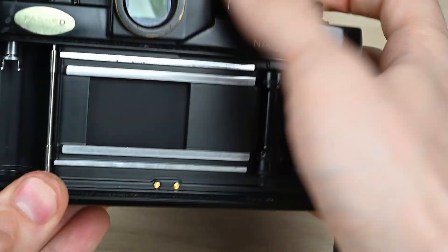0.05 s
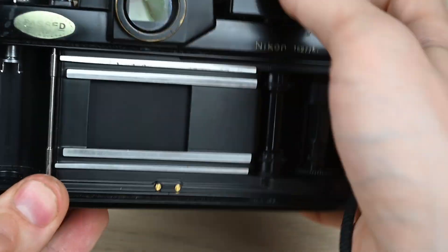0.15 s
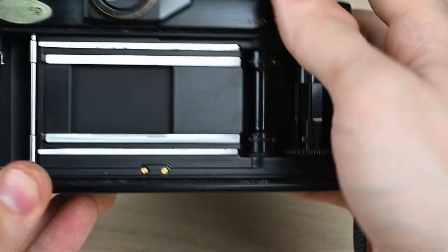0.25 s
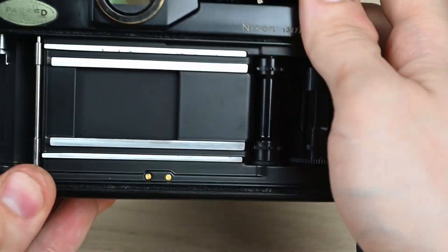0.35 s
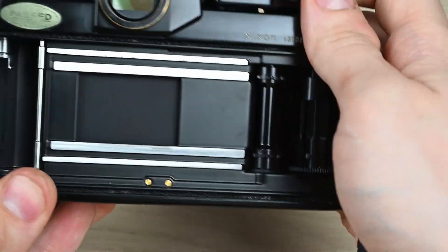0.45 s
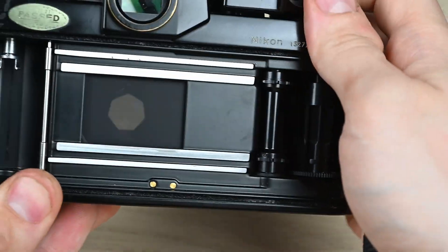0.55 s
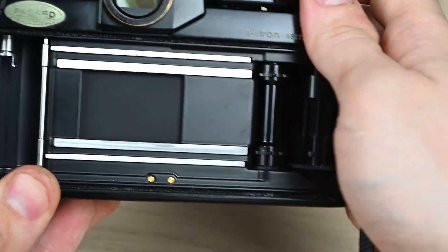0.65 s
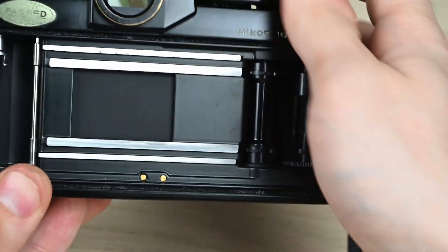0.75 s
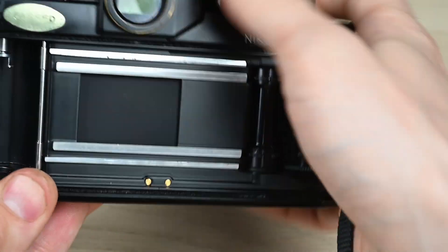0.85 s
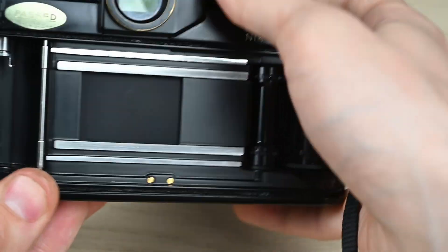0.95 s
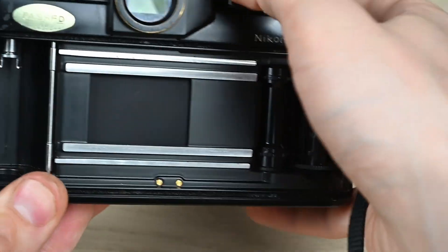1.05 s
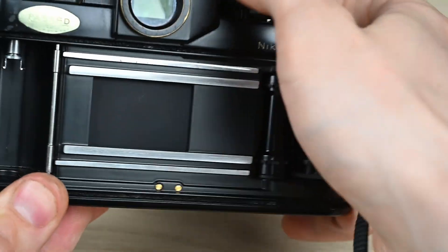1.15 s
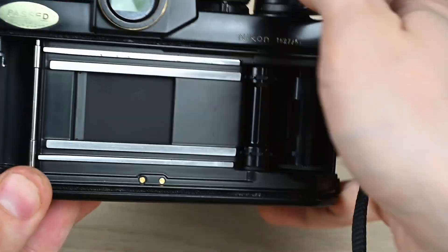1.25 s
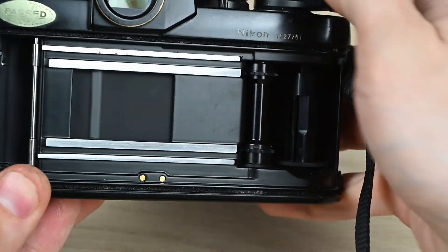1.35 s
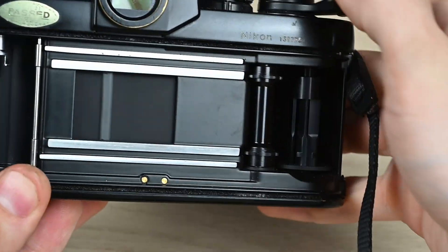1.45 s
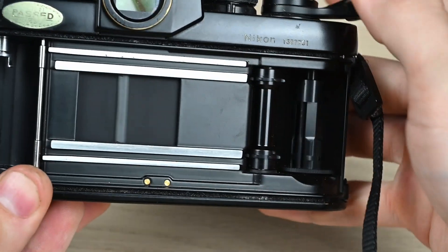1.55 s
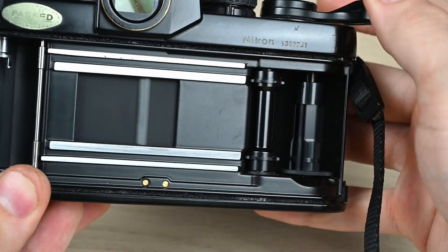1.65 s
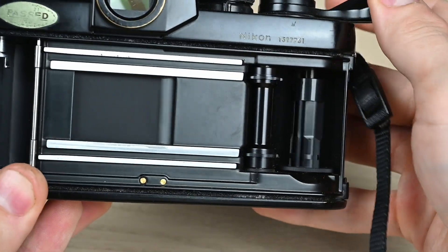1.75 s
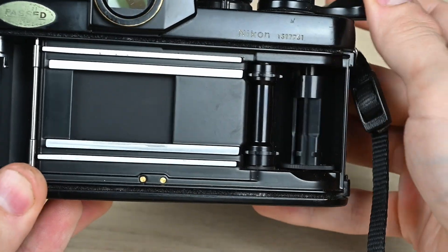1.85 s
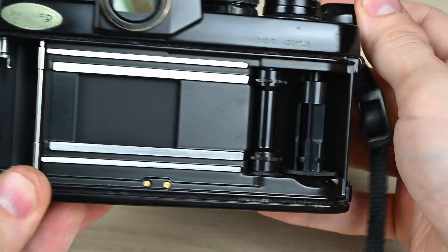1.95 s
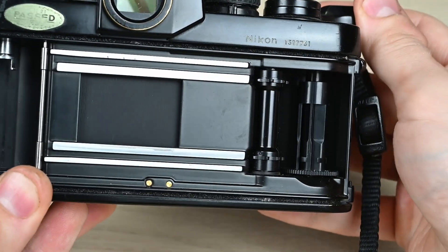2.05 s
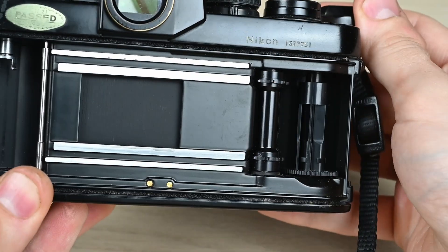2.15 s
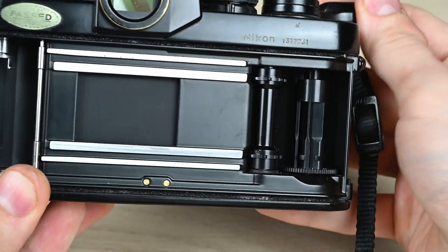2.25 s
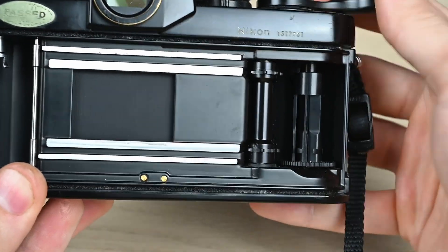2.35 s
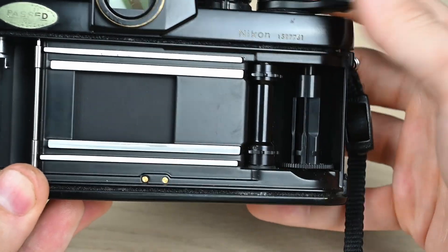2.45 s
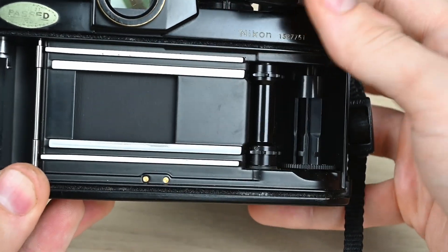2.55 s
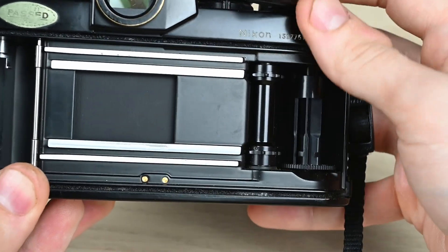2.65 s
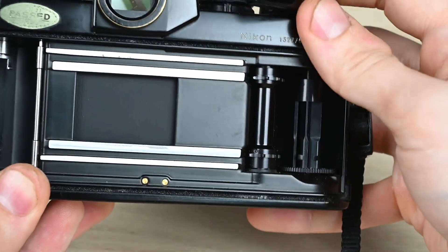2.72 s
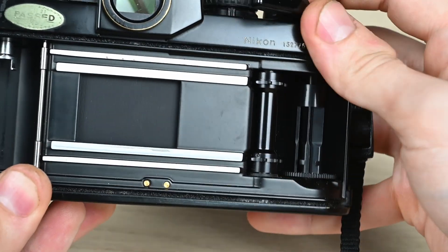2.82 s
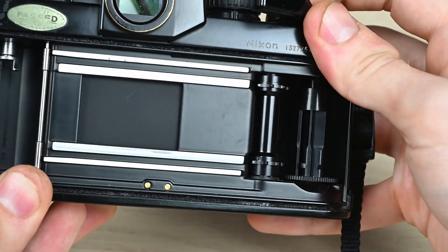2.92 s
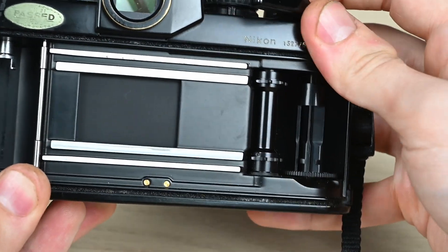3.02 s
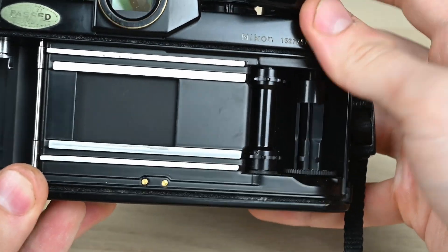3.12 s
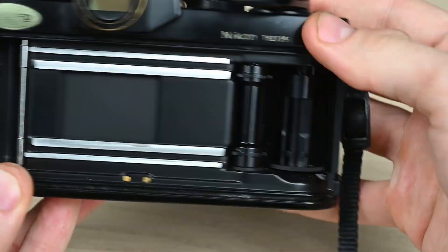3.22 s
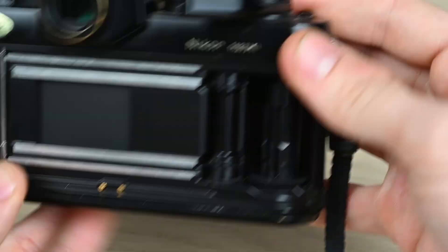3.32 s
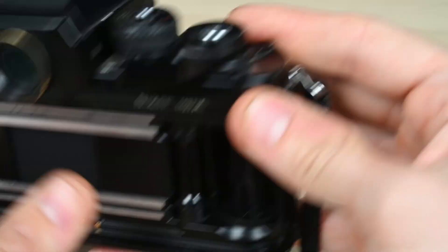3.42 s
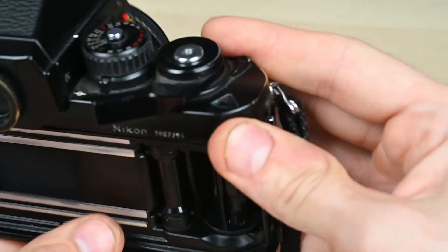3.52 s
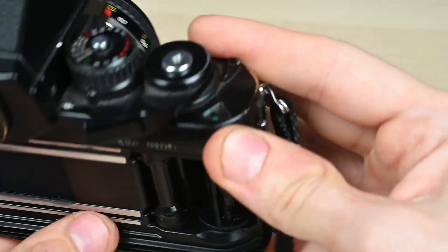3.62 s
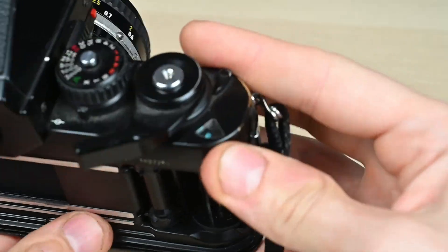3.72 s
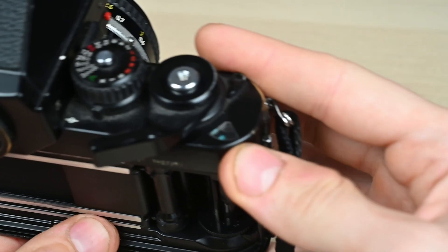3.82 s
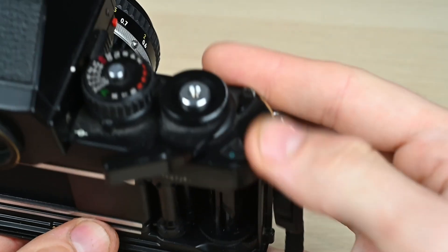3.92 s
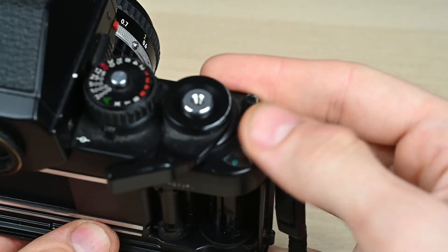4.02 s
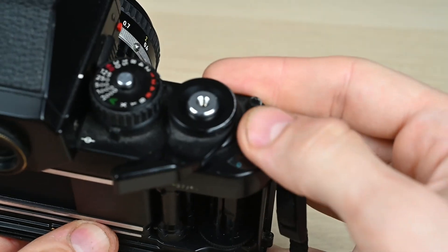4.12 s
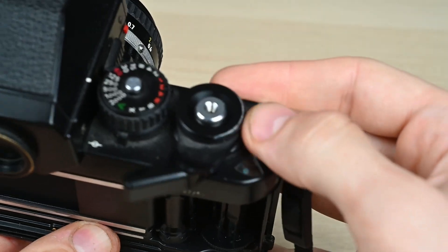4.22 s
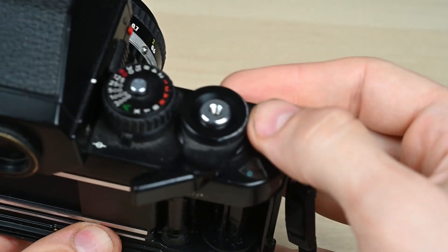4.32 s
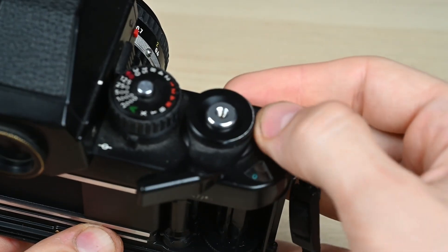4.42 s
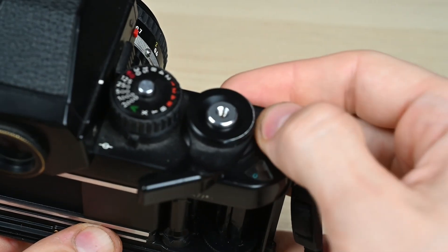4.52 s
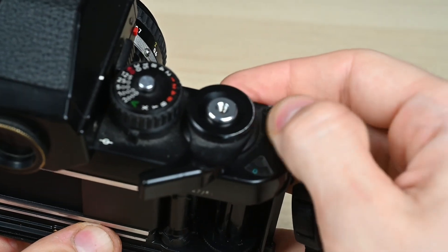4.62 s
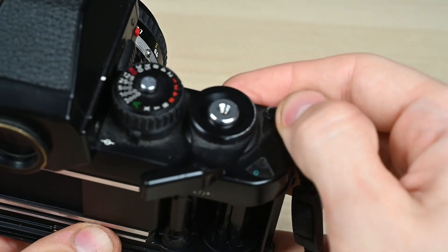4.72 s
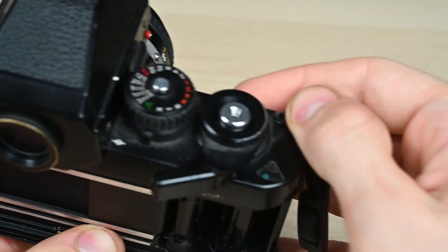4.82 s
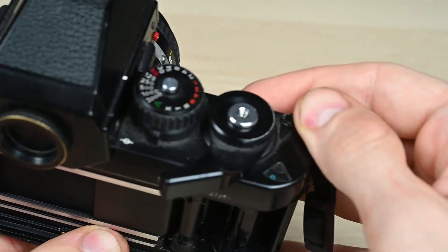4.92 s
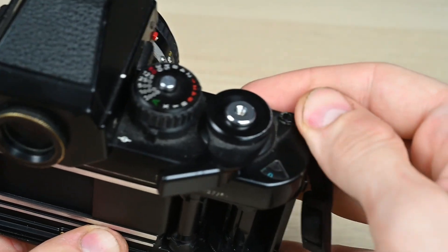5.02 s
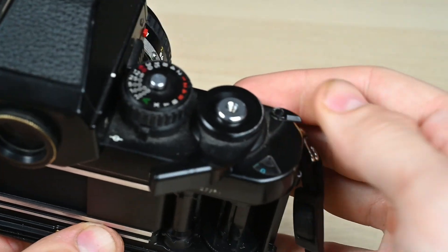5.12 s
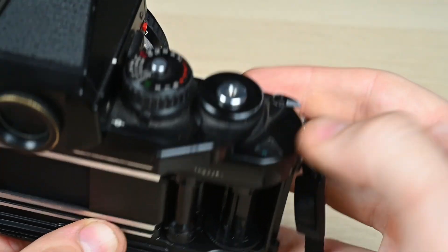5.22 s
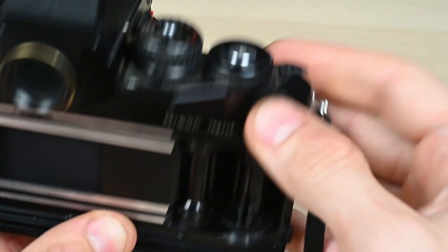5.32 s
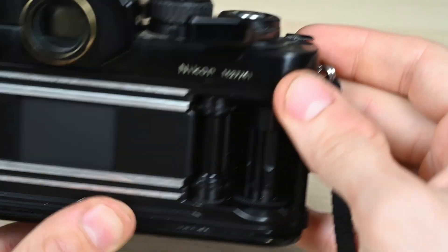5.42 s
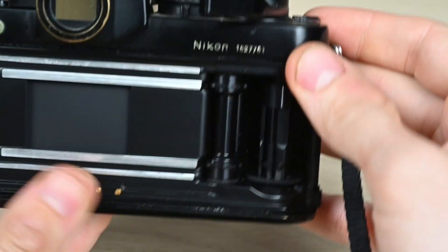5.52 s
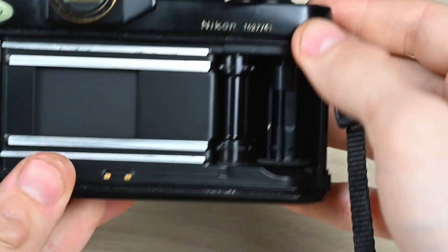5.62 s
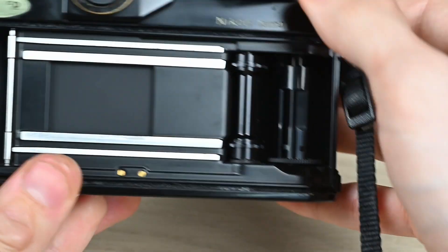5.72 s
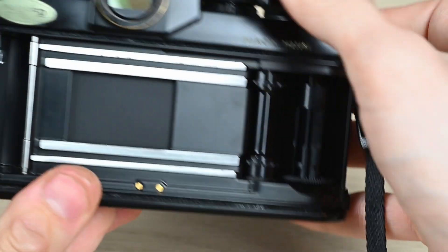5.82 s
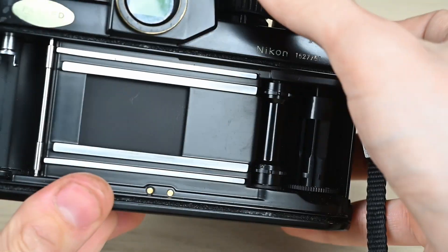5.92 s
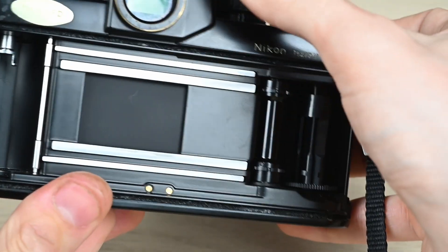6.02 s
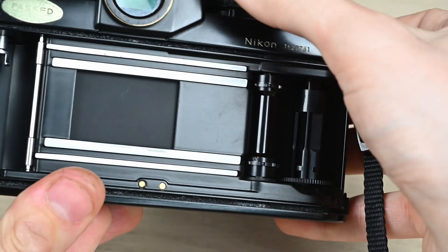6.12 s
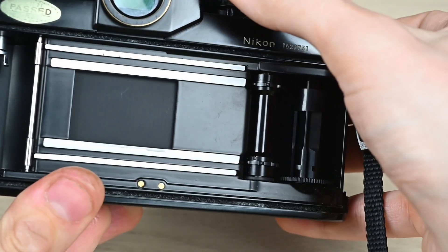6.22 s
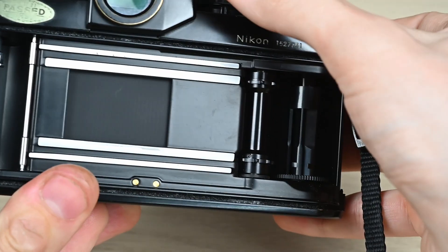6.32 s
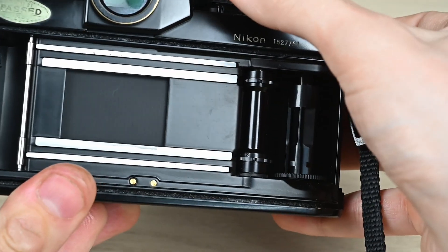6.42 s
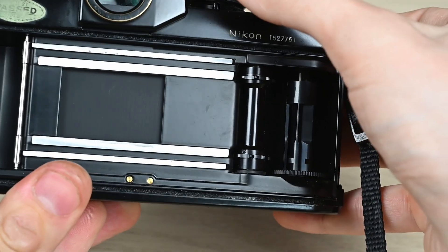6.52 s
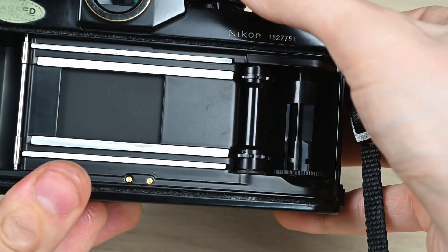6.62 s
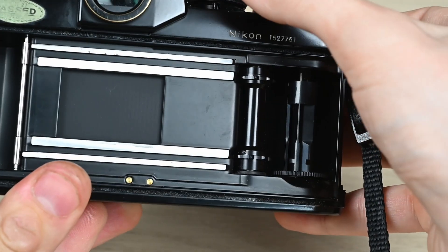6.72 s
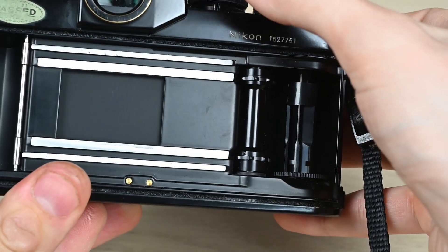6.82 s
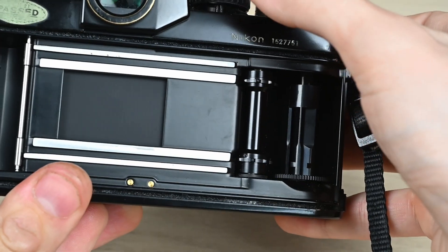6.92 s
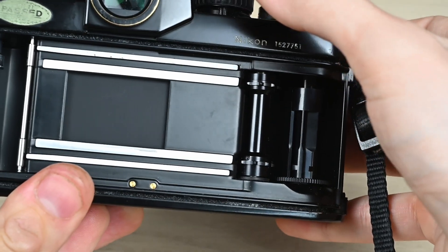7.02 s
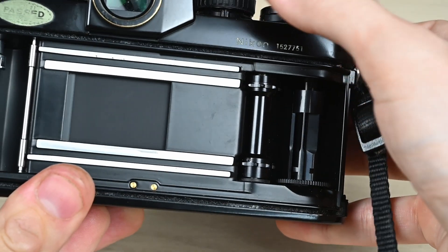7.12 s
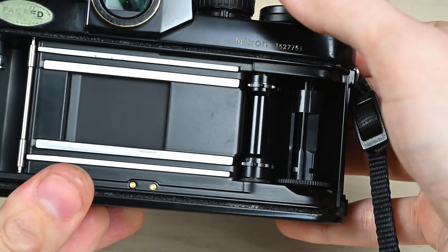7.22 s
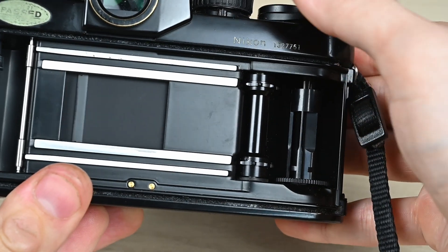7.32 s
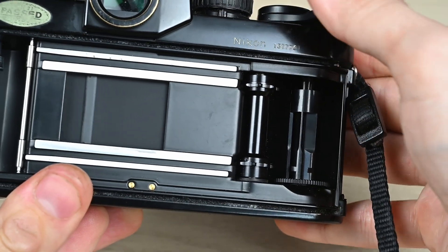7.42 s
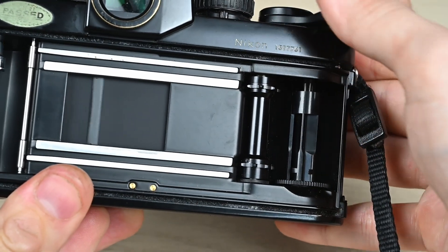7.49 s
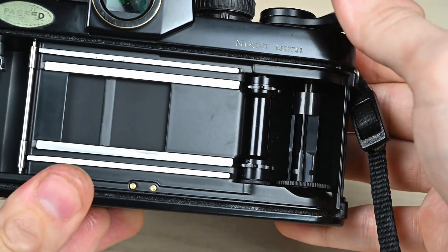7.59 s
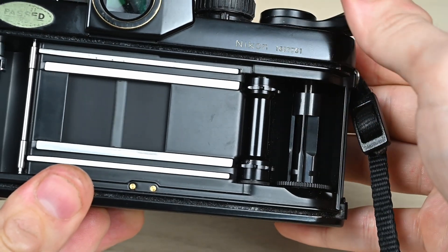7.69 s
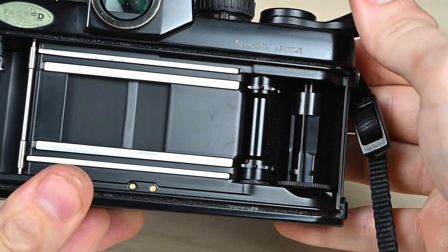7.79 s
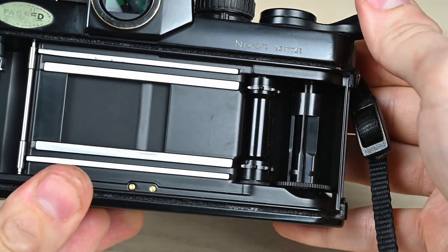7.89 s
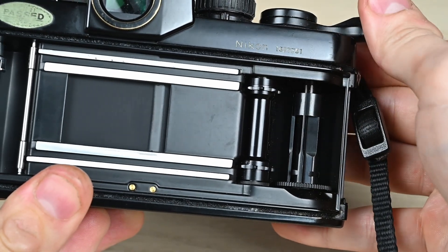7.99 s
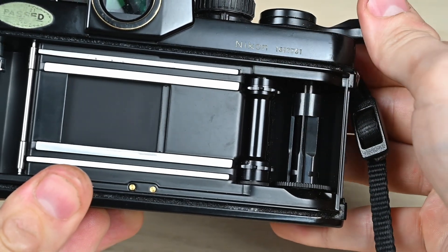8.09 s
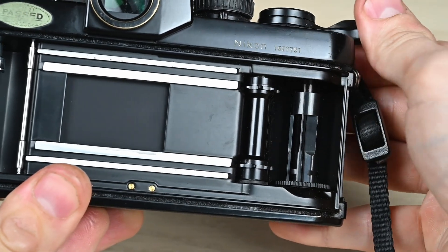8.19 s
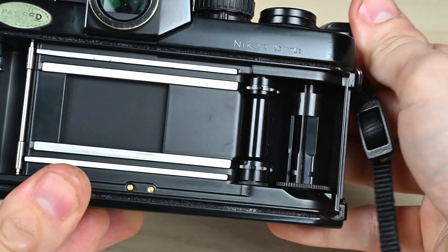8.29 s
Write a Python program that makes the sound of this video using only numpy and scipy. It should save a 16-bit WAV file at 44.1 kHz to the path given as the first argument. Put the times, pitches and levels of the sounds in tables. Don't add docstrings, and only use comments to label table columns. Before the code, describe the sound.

A mechanical film camera is handled very close to the microphone in a small, quiet room with faint low rumble and a short diffuse tail. Soft finger taps and scrapes lead to a loud shutter clack at 0.6 s, a dense burst of metal impacts lasting about 60 milliseconds, with a tiny settling tick afterward. From 1.15 to 1.8 s the wind lever's gears tick lightly with sliding friction and a bright pawl snap, then a catch and hard clunk at 1.9-2.0. A crisp latch snaps at 2.53, and the shutter fires again at 2.9, slightly softer. From 3 to 6.9 s there are only faint taps, creaks, scrapes and dull palm thuds, with a regrip near 5.5. A small double click comes at 6.96. Scraping and sparse ticks from 7.1 build to a bright pawl drop near 7.96, a catch at 8.18 and a final heavy lever stop around 8.3.

```python
import sys
import numpy as np
from scipy import signal
from scipy.fft import rfft, irfft, next_fast_len
from scipy.io import wavfile
from scipy.ndimage import uniform_filter1d

SR = 44100
rng = np.random.default_rng(int(sys.argv[2]) if len(sys.argv) > 2 else 0)


def gain_from_db(level_db):
    decades = np.asarray(level_db, float) / 20
    return 10 ** decades


def file_out(sig):
    cols = np.atleast_2d(sig).T
    lim = np.clip(cols, -1, 1)
    pcm = np.round(lim * 32767).astype(np.int16)
    wavfile.write(sys.argv[1], SR, pcm)


N = 368235

# pitch [Hz], width [Hz], level [dB].
GEAR_RING = [(594, 330, 10), (1750, 300, 5.5), (3780, 620, -0.5), (5470, 350, -10), (6740, 1700, -11.5),
             (9500, 310, -19), (9700, 67, -13), (13200, 180, -8.5), (14500, 430, -11.5)]


def shutter():
    # time in s, peak in dB, strongest ring in Hz, bass in dB, treble in dB.
    impacts = [
        (.557, -25.5, 1363, -11, 1.5),
        (.5587, -7, 2682, -25, -3),
        (.5835, -15.5, 1161, -8, -6.5),
        (.5919, -8, 1990, -22.5, -5),
        (.5942, -22, 9500, -14.5, 7.5),
        (.6068, -9.5, 2816, -16, 7),
        (.6114, -10, 1677, -21, -3),
        (.6134, -6.5, 2800, -21, -4),
        (.6172, -14, 2684, -11.5, 3.5),
        (.722, -28.5, 2059, -8.5, 7),
    ]
    # s after the first firing, level in dB.
    firings = [
        (0.0, -1.46),
        (2.3310, -2),
    ]
    # base in ms, ms per dB of treble, ms per dB under full scale.
    rattle = (3.8, 0.27, .05)
    # pitch in Hz, width in Hz, level in dB.
    ring = [(640, 250, -12.5), (790, 44, -2.5), (1270, 60, 4.5), (1900, 64, 0), (2890, 87, -2),
            (4082, 56, 0), (5900, 190, -8.5), (8800, 400, -14.5), (10700, 230, -15.5), (13300, 510, -15)]
    # s in the first firing, peak in dB, pitch in Hz, t60 in s.
    casting = [
        (.6116, -7, 795, .028),
        (.6116, -9, 1250, .022),
        (.6116, -18, 640, .04),
        (.6116, -21, 1220, .07),
        (.6116, -19, 1277, .07),
        (.5590, -17, 1350, .04),
        (.5838, -23, 1100, .025),
    ]
    once = clicks(timed(impacts, rattle), ring, own_db=2, plain_db=-9, lead=1.2)
    once = once - swings(casting, rise_s=.0003)
    out = np.zeros(N)
    for later, db in firings:
        add(out, later, gain_from_db(db) * once)
    return out


def lever_stops():
    # time in s, peak in dB, strongest ring in Hz, bass in dB, treble in dB.
    stops = [(1.9405, -17.5, 1900, -15, -8.5), (1.9448, -16.5, 2960, -18, -0.5),
             (1.9630, -20.5, 1840, -18, -14), (1.9668, -3, 1270, -8, -13.5),
             (1.9715, -18.5, 3774, -11, -0.5), (8.2703, -21.5, 725, -10, 0), (8.2738, -14, 1900, -7.5, -9),
             (8.2777, -11, 2850, -17, -4.5), (8.3258, -24.5, 1780, -10, -15), (8.3294, -2, 1270, -8.5, -21),
             (8.3335, -16, 1502, -11, -2)]
    catches = [
        (1.8750, -16, 4710, -25.5, -17.5),
        (8.1834, -18, 4230, -28, -22),
    ]
    # base in ms, ms per dB of treble, ms per dB under full scale.
    stop_rattle = (1.7, -0.016, 0.12)
    catch_rattle = (1.4, 0, 0)
    # pitch in Hz, width in Hz, level in dB.
    ring = [(570, 870, -2), (1270, 80, 2.5), (1700, 170, 1), (2460, 90, -10.5), (3200, 100, -13),
            (4400, 370, -9.5), (7030, 470, -6), (9400, 600, -13), (12600, 900, -15)]
    rows = timed(stops, stop_rattle) + timed(catches, catch_rattle)
    return clicks(rows, ring, own_db=1, plain_db=-12, lead=3.5)


def gear_teeth():
    # time in s, peak in dB, strongest ring in Hz, treble in dB.
    ticks = [(1.14, -51, 2030, 2), (1.1755, -40.5, 790, 3.5), (1.2215, -36, 4800, -10),
             (1.2388, -30.5, 2160, 1.5), (1.2425, -34.5, 1798, -9), (1.253, -32.5, 1750, -1),
             (1.2465, -30.5, 1700, -25), (1.2815, -48.5, 594, 8.5), (1.366, -43, 1190, -4),
             (1.394, -41, 1930, -19.5), (1.522, -55, 610, 15), (1.6265, -40, 4150, 1),
             (1.631, -34, 1800, -9), (1.646, -40, 7400, 8), (1.652, -41, 7500, -2), (1.67, -43, 1720, -3),
             (1.64, -29, 3780, 6.5), (1.6555, -29, 1740, -1), (1.6615, -29, 1720, -4),
             (1.681, -37.5, 3000, 3.5), (1.905, -52, 1472, -0.5), (7.195, -46.5, 1605, -8.5),
             (7.298, -58.5, 1168, -6), (7.392, -50.5, 1247, -6.5), (7.422, -47, 897, -18.5),
             (7.44, -40.5, 2005, -23.5), (7.7185, -36.5, 3760, -5), (7.7498, -28.5, 3940, 7),
             (7.78, -48, 577, -9), (7.787, -25.5, 3020, -5), (7.8245, -39.5, 3540, 8.5),
             (7.865, -42.5, 2800, -13), (7.909, -50, 700, -17), (8.03, -50.5, 760, -22),
             (8.073, -63, 1180, -9)]
    # dB at 1 kHz, dB per octave of the ring.
    bass = (0.3, -10)
    # base in ms, ms per dB of treble, ms per dB under full scale.
    rattle = (2.8, -.02, -.003)
    return clicks(timed(weighted(ticks, bass), rattle), GEAR_RING, own_db=10.5, plain_db=-9, lead=4.7)


def pawls():
    # time in s, peak in dB, strongest ring in Hz, bass in dB, treble in dB.
    drops = [
        (1.7668, -25, 6646, -13, 5),
        (7.737, -42.5, 7050, -6, 2.2),
        (7.76, -39, 7580, -22, 4.4),
        (7.9645, -23, 5000, -34, 2),
    ]
    # base in ms, ms per dB of treble, ms per dB under full scale.
    rattle = (3.5, 0.0082, 0.034)
    # pitch in Hz, width in Hz, level in dB.
    ring = [(1934, 120, 0), (4900, 600, -3.5), (6900, 54, 1.5), (6726, 520, -1.5), (7700, 170, -1.5),
            (8750, 130, -12.5), (10300, 120, -24.5), (13100, 190, -13)]
    return clicks(timed(drops, rattle), ring, own_db=-9.0, plain_db=-7.0, lead=7.0)


def latches():
    # time in s, peak in dB, strongest ring in Hz, bass in dB, treble in dB.
    snaps = [
        (2.5332, -14, 4530, -34, -3),
        (2.5348, -8.5, 2030, -32, -1),
        (2.5362, -11, 2710, -32, -2),
        (2.545, -23, 2400, -30, -4),
        (2.552, -28, 2030, -30, -4),
        (2.556, -26, 2710, -30, -4),
    ]
    # base in ms, ms per dB of treble, ms per dB under full scale.
    rattle = (.6, 0, .12)
    # pitch in Hz, width in Hz, level in dB.
    ring = [(2030, 250, -0.5), (2414, 73, 9), (2710, 110, -5.5), (3060, 860, -3.5), (3480, 120, 4),
            (3980, 320, -3.5), (4530, 230, 2.5), (5090, 100, -5.5), (6800, 300, -15.5), (9000, 120, -6.5),
            (9730, 120, -1.5), (11700, 300, -7)]
    return clicks(timed(snaps, rattle), ring, own_db=-43, plain_db=-9.5, lead=0.4)


def button():
    # time in s, peak in dB, strongest ring in Hz, bass in dB, treble in dB.
    presses = [
        (6.9553, -31, 9050, -14.5, 3.9),
        (6.9592, -23.5, 1750, -38, 4.4),
    ]
    # base in ms, ms per dB of treble, ms per dB under full scale.
    rattle = (2.6, 0, 0)
    # pitch in Hz, width in Hz, level in dB.
    ring = [(1770, 67, 4.5), (2780, 91, -3), (6530, 104, -10), (8700, 320, -12), (8900, 93, -4),
            (12200, 180, 1.5), (14100, 400, -8)]
    return clicks(timed(presses, rattle), ring, own_db=-1.5, plain_db=-9.5, lead=4.2)


def rides():
    # start in s, length in s, level in dB, pitch in Hz.
    hums = [
        (1.742, .03, -52, 800),
        (1.782, .035, -53, 780),
        (1.862, .015, -52, 780),
        (1.655, .028, -47, 1720),
        (1.245, .04, -51, 1750),
        (1.241, .045, -50, 640),
        (7.915, .048, -56, 880),
    ]
    noise, hz = rfft(rng.standard_normal(N)), np.fft.rfftfreq(N, 1 / SR)
    out = np.zeros(N)
    for start, length, db, pitch_hz in hums:
        hum = irfft(noise * mode(hz, pitch_hz, .14 * pitch_hz) ** 2, N)
        out += stroke(start, length, db) * evened(hum)
    return gain_from_db(-2.0) * out


def slides():
    # start in s, length in s, level in dB, centre of the scrape in Hz.
    scrapes = [(0.0, 0.13, -70, 1440), (0.267, 0.145, -72, 1278), (1.159, 0.29, -68, 1210),
               (1.491, 0.23, -64, 634), (1.612, 0.065, -55.5, 1410), (1.706, 0.12, -58, 790),
               (1.86, 0.068, -66, 780), (3.243, 0.132, -69, 1175), (3.645, 0.17, -76, 1012),
               (4.634, 0.123, -78.5, 2314), (5.885, 0.098, -76, 2437), (6.195, 0.11, -75, 1304),
               (6.297, 0.26, -79.5, 1836), (7.124, 0.39, -72, 1037), (7.53, 0.14, -63, 657),
               (7.677, 0.433, -59.5, 692), (7.996, .13, -71, 713), (8.175, 0.1443, -57, 1282)]
    # Hz, dB per Hz.
    tone_points = [(300, -2), (500, 13.5), (750, -16.5), (1200, -2.5), (1800, -10), (3000, -19.5),
                   (8000, -31.5), (16000, -48.5)]
    frames, hz = N // 128 + 5, np.fft.rfftfreq(512, 1 / SR)[:, None]
    a, b, patches = rng.standard_normal((frames, 257, 3)).T
    patches = uniform_filter1d(patches, size=3, axis=0)
    patches = evened(uniform_filter1d(patches, size=9, axis=1))
    start, length, _, centre_hz = np.transpose(scrapes)
    centre_hz = np.interp(np.arange(frames) * 128 / SR, start + length / 2, centre_hz)
    tone = gain_from_db(read(tone_points, hz)) + gain_from_db(8.0) * abs(mode(hz, centre_hz, .22 * centre_hz))
    z = (a + 1j * b) * tone * gain_from_db(3.0 * patches)
    scrape = evened(signal.istft(z, nperseg=512, noverlap=384)[1][:N])
    return scrape * gain_from_db(4.0) * sum(stroke(*row[:3]) for row in scrapes)


def touches():
    # time in s, peak in dB, strongest ring in Hz,
    # treble in dB.
    light_clicks = [(0.02, -50, 1680, -9), (0.045, -54, 1940, -23), (0.084, -43.5, 1520, -5),
                    (0.131, -48.5, 1940, -21), (0.241, -56, 1720, -10), (0.292, -49.5, 4720, -2),
                    (0.318, -36.5, 1854, -5.5), (1.049, -55, 1770, -14.5), (2.322, -46, 1700, -18),
                    (2.332, -38.5, 1180, -10), (2.369, -44, 1900, -14.5), (2.757, -55, 1584, -26),
                    (3.315, -41, 3580, -6.5), (3.347, -61, 1420, -9), (3.444, -52, 2200, -19),
                    (3.555, -60, 6750, 5), (3.686, -56.5, 1270, -9.5), (3.947, -58, 12100, 5),
                    (4.656, -49.5, 5800, -2.5), (4.6652, -50, 1950, 0), (4.719, -58.5, 1935, -7),
              (4.736, -54.5, 2862, 8), (5.115, -49.5, 2060, 0), (5.378, -50, 3000, 0.5),
              (5.403, -48, 6640, 0), (5.43, -50.5, 1290, -10.5), (5.519, -53, 3655, -6.5),
              (5.8837, -43.5, 2780, -20.5), (5.893, -37, 2740, -6), (5.972, -47.5, 4100, -18.5),
              (6.0063, -54, 4140, -3.5), (6.083, -50.5, 1380, -12.5), (6.116, -45.5, 1740, -8),
              (6.1987, -62.5, 1340, -15), (6.23, -54.5, 1720, -10), (6.275, -60, 1283, -3),
              (6.512, -44.5, 1890, -5)]
    # dB at 1 kHz, dB per octave of the ring.
    bass = (-15, -5)
    # base in ms, ms per dB of treble, ms per dB under full scale.
    rattle = (4.4, -.02, -0.0034)
    return clicks(timed(weighted(light_clicks, bass), rattle), GEAR_RING, own_db=8.5, plain_db=-4.5, lead=3.1)


def thuds():
    # time in s, peak in dB, pitch in Hz, t60 in s.
    knocks = [(0.111, -58.5, 148, 0.18), (0.348, -48, 161, 0.089), (0.393, -46, 144, 0.095),
              (0.604, -43.5, 213, 0.23), (0.998, -51, 137, 0.16), (1.17, -57, 151, 0.12),
              (1.638, -48, 214, 0.22), (1.96, -28, 229, 0.04), (2.935, -44, 225, 0.2),
              (3.321, -42, 153.8, 0.19), (3.483, -54.5, 186, 0.17), (3.595, -49.5, 147, 0.15),
              (8.267, -48, 170, 0.19), (8.325, -26.5, 243, 0.047)]
    springs = [
        (1.767, -64.5, 6900, .5),
        (1.8, -47.5, 6900, .55),
        (2.537, -44.5, 4300, 0.2),
        (2.535, -86, 8900, 0.19),
        (9.9, -73, 9500, 0.32),
    ]
    frame = [
        (1.9672, -16, 1275, .09),
        (8.3298, -16, 1278, .09),
    ]
    return swings(knocks + springs, rise_s=0.009) + swings(frame, rise_s=.001)


def grip():
    # start in s, length in s, level in dB.
    shifts = [
        (0, 1.43, -67.5),
        (1.3, 1.13, -72.5),
        (2.593, 0.89, -64),
        (3.29, 0.42, -62),
        (5.432, 0.373, -57),
        (7.721, .63, -70),
    ]
    lumps = gain_from_db(9.0 * evened(uniform_filter1d(rng.standard_normal(N), 1500)))
    thud = colour(rng.standard_normal(N), [(60, -28.0), (110, -3.0), (155, -0.5), (260, -3.0), (600, -25.5)])
    resting_db = -72.5
    return evened(thud * lumps) * (gain_from_db(resting_db) + sum(stroke(*row) for row in shifts)) * gain_from_db(-5.0)


def room(x):
    # Hz, t60 in s.
    decay = [(300, 0.33), (450, 0.38), (600, .45), (790, 0.4), (2090, .41), (5510, .42), (14600, 0.23)]
    # Hz, dB.
    tone_points = [(250, -11), (420, -11.5), (550, -6.5), (720, -4), (950, -8.5), (1300, -8), (2000, -7),
                   (6000, -3), (15000, -5.5)]
    hz, t, z = signal.stft(x, SR, nperseg=256, noverlap=192)
    power = uniform_filter1d(abs(z) ** 2, size=3, axis=0) + 0.94 * abs(z) ** 2
    keep = gain_from_db(-120 * 64 / SR / read(decay, hz))
    quick = gain_from_db(-120 * 64 / SR / 0.009)
    late = np.array([signal.lfilter([1 - k], [1, -k], p) for k, p in zip(keep, power)])
    held = late + gain_from_db(-7.5) * signal.lfilter([1 - quick], [1, -quick], power)
    a, b = rng.standard_normal((len(t), len(hz), 2)).T
    tail = signal.istft(np.sqrt(held) * (a + 1j * b), SR, nperseg=256, noverlap=192)[1]
    return np.concatenate([np.zeros(200), colour(tail, tone_points)])[:N]


def room_air():
    # Hz, dB per Hz.
    air_points = [(20, -38), (33, -22), (42, -8), (52, 1.5), (68, -7), (100, -12), (150, -11), (300, -16),
                  (520, -22), (800, -24.5), (2000, -26.5), (5000, -29.5), (14000, -30), (16200, -32)]
    return gain_from_db(-64.5) * evened(colour(rng.standard_normal(N), air_points))


def side_signal(x):
    # Hz, side below mid in dB.
    width_points = [(60, -30.5), (150, -34.5), (380, -36), (950, -39.5), (2380, -27), (5980, -22.5),
                    (15000, -13)]
    # Hz, dB per Hz.
    hiss_points = [(100, -4), (1000, -4), (4000, -2.5), (15000, 2.5)]
    later = np.concatenate([np.zeros(60), x])[:N]
    return colour(later, width_points) + gain_from_db(-77) * evened(colour(rng.standard_normal(N), hiss_points))


def click(row, ring, own_db, plain_db, lead):
    s, peak_db, own_hz, bass_db, treble_db, length_ms = row
    t, hz = np.arange(2048) / SR, np.fft.rfftfreq(2048, 1 / SR)
    impacts, strength = rng.standard_normal((2, 2048))
    rattle = impacts * gain_from_db(3.1 * strength) * np.exp(-(t * 1000 / length_ms) ** 2.2)
    rattle = rattle * np.minimum(t * 1000 / (0.37 * length_ms), 1)
    rattle = rattle + lead / length_ms ** 2 * np.exp(-((t - .0003) / .00004) ** 2)
    rings = ring + [(own_hz, 0.062 * own_hz, own_db), (4000, 16000, plain_db)]
    body = np.sqrt(sum(abs(gain_from_db(db) * mode(hz, f, w)) ** 2 for f, w, db in rings))
    body = body / np.sqrt(uniform_filter1d(abs(rfft(rattle)) ** 2, size=21))
    bands = mode(hz, np.array([[720], [2200], [9000]]), np.array([[600], [4500], [13000]]))
    parts = body * abs(bands) ** 2
    peaks = np.array([abs(irfft(rfft(rattle) * causal(p))).max() for p in parts])
    gains = gain_from_db(np.array([bass_db, 0, treble_db])) / peaks
    blend = np.linalg.norm(parts * gains[:, None], axis=0)
    return s, gain_from_db(peak_db) * irfft(rfft(rattle) * causal(blend))


def clicks(rows, ring, own_db, plain_db, lead):
    out = np.zeros(N)
    for row in rows:
        add(out, *click(row, ring, own_db, plain_db, lead))
    return out


def timed(rows, rattle):
    ms, per_treble, per_weak = rattle
    return [(*row, max(ms + per_treble * row[4] - per_weak * row[1], 1.2)) for row in rows]


def weighted(rows, bass):
    at_1k_db, per_octave_db = bass
    return [(s, db, hz, at_1k_db + per_octave_db * np.log2(hz / 1000), treble_db)
            for s, db, hz, treble_db in rows]


def swings(rows, rise_s):
    out, t = np.zeros(N), np.arange(8000) / SR
    for s, db, hz, t60 in rows:
        swing = gain_from_db(db - 60 * t / t60) * np.sin(2 * np.pi * hz * t)
        add(out, s, swing * np.minimum(t / rise_s, 1))
    return out


def stroke(start, length, db):
    rise_s, fall_s = 0.0057, 0.0077
    t = np.arange(N) / SR - start
    ramp = np.minimum(t / rise_s + .5, (length - t) / fall_s + .5)
    return gain_from_db(db) * np.clip(ramp, 0, 1) ** 2


def mode(hz, centre_hz, width):
    return 1j * hz * width / (centre_hz ** 2 - hz ** 2 + 1j * hz * width)


def causal(gain):
    log = np.log(np.maximum(gain, 1e-5))
    mirrored = np.concatenate([log, log[-2:0:-1]])
    return np.exp(np.conj(signal.hilbert(mirrored))[:len(log)])


def evened(x):
    return x / np.sqrt(np.mean(x ** 2) + 1e-20)


def read(points, hz):
    f, value = np.transpose(points)
    return np.interp(np.log(hz + 1), np.log(f + 1), value)


def colour(x, points):
    size = next_fast_len(len(x))
    gain = gain_from_db(read(points, np.fft.rfftfreq(size, 1 / SR)))
    return irfft(rfft(x, size) * gain, size)[:len(x)]


def add(mix, s, sound):
    part = mix[round(s * SR):][:len(sound)]
    part += sound[:len(part)]


def scene():
    winder = lever_stops() + gear_teeth() + pawls() + latches() + button() + rides()
    camera = shutter() + winder + slides() + touches()
    heard = camera + room(camera)
    mid = heard + thuds() + grip() + room_air()
    side = side_signal(heard)
    return np.array([mid + side, mid - side])


def low_pass(x):
    return signal.sosfilt(signal.butter(12, 16370, fs=SR, output="sos"), x)


def record(dry):
    lowpass = signal.firwin(255, 16100, window=("kaiser", 8), fs=SR)
    x = signal.oaconvolve(dry, lowpass[None], "same")
    return low_pass(np.clip(x, -1, 1))


dry = scene()
out = record(dry)
file_out(out)
```